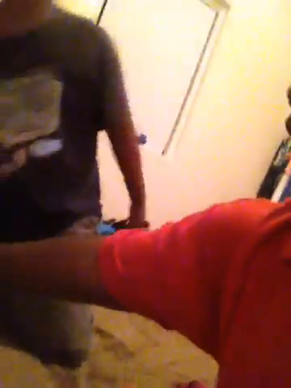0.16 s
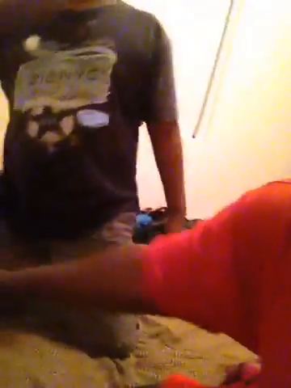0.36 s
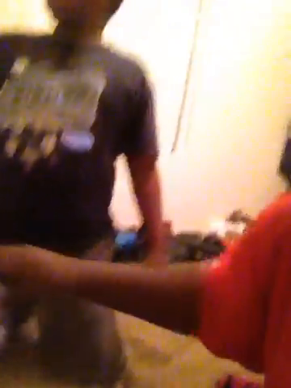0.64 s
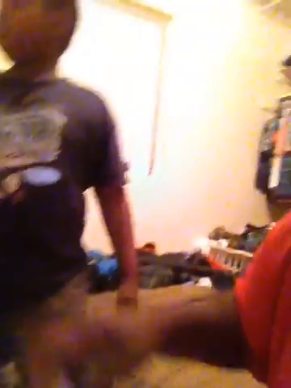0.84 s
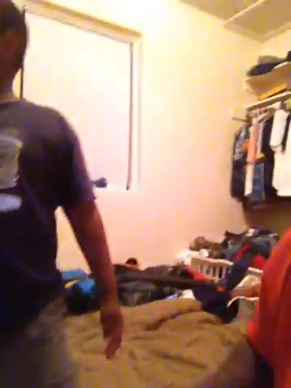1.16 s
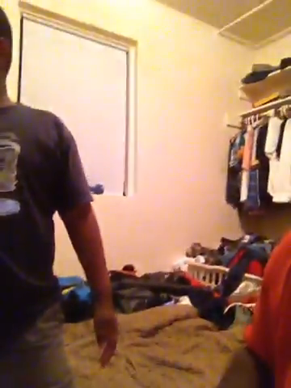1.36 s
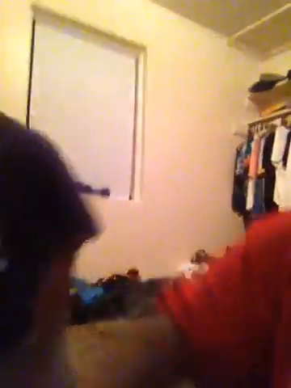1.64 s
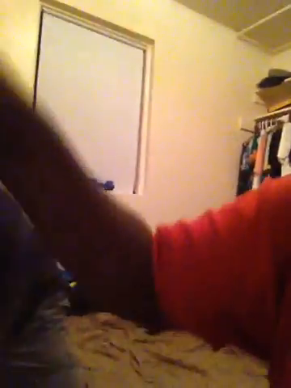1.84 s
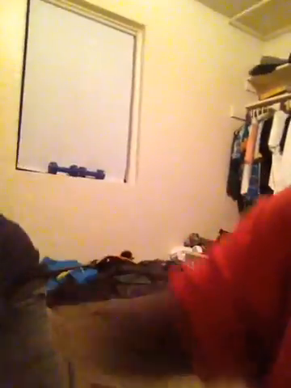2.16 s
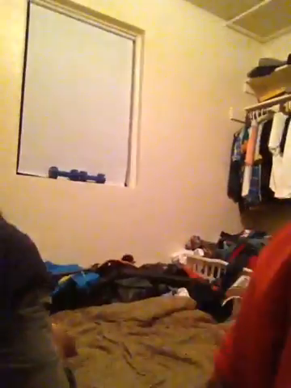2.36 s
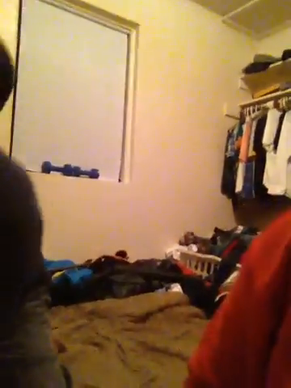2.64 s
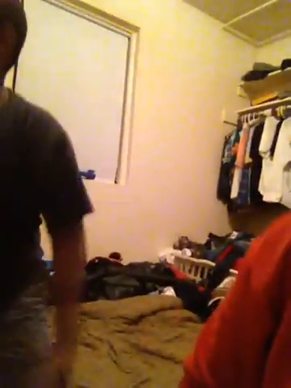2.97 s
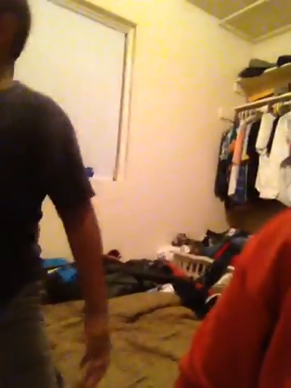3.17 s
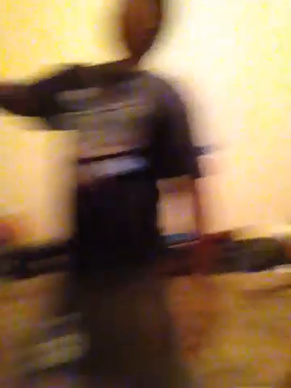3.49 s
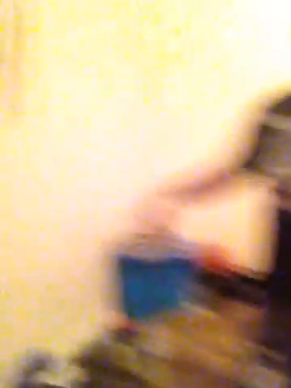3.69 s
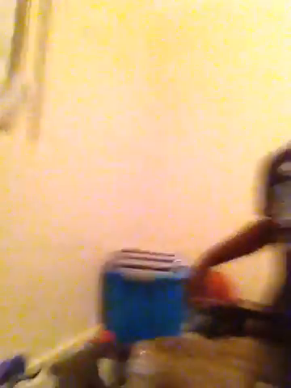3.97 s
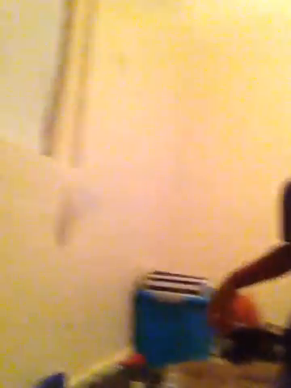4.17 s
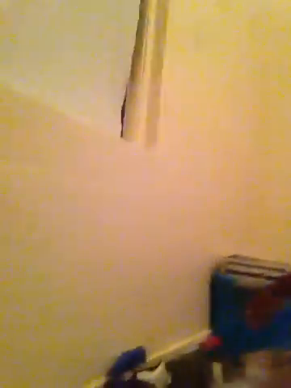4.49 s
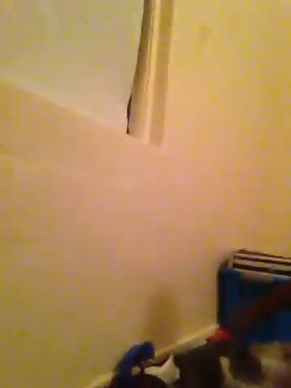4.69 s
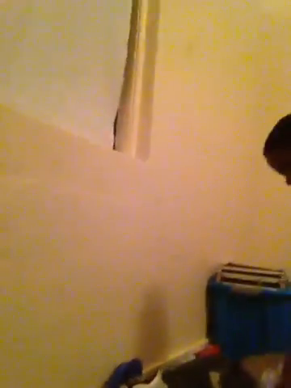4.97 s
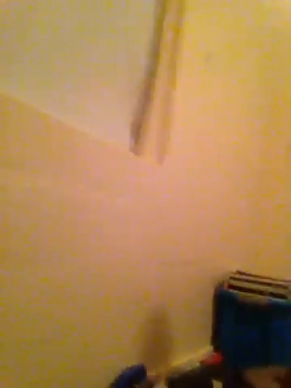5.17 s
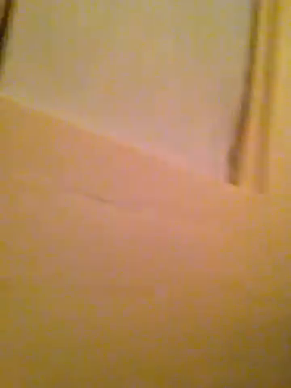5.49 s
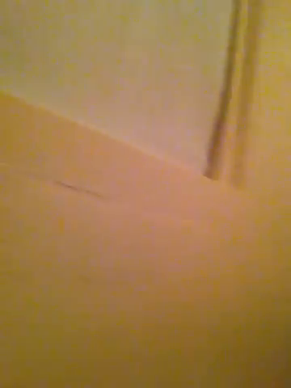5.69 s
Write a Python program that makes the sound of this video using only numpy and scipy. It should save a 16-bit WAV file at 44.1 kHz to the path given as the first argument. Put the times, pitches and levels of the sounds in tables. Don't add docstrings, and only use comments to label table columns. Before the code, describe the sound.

In a small furnished bedroom, a hollow empty plastic bottle rattles at once with a splash of water. Then part-filled bottles land one after another on a bed cover and floor, each a sharp knock, dull thud and burst of watery crackle. Hands pop dents in thin plastic between flips, and faint creaks come late. A small close microphone adds steady hiss and a faint high whistle.

```python
import sys
import numpy as np
from scipy import signal
from scipy.io import wavfile
from scipy.ndimage import uniform_filter1d

SR = 44100
rng = np.random.default_rng(int(sys.argv[2]) if len(sys.argv) > 2 else 0)


def to_linear_factor(level_db):
    exponent = np.asarray(level_db, float) / 20
    return 10 ** exponent


def waveform_to_disk(signal):
    frames = np.transpose(np.atleast_2d(signal))
    scaled = np.clip(frames, -1, 1) * 32767
    samples = np.round(scaled).astype(np.int16)
    wavfile.write(sys.argv[1], SR, samples)


N = 257014

# f/Hz, level/dB per Hz
HISS_SPECTRUM = [(15, -39), (40, -30.5), (90, -16), (143, -12.5), (214, 3), (865, -11.5), (1290, -10),
                 (3060, -13), (9440, -24.5), (13000, -19), (15400, -14)]
# t/s, f/Hz, level/dB
WHISTLE = [(0, 14250, -95), (.43, 14250, -95), (.47, 14260, -76), (2.9, 14150, -77), (4.75, 14110, -77),
           (4.82, 14130, -92), (5.42, 14230, -90), (5.47, 14260, -76), (5.83, 14260, -77)]
# t/s, blow level/dB, dullness/0-1
EMPTY_BOUNCES = [
    (0, -14, 0),
    (.031, -9.5, 0.92),
    (.042, -34, 1),
    (.05, -9.5, 0.44),
    (.063, -12, 0.1),
    (.097, -18.5, 0),
    (.112, -8.5, 0.38),
    (.124, -35, 0.2),
    (.148, -14, 0.26),
]
# f/Hz, level/dB, t60/s
EMPTY_MODES = [(615.2, -10, 0.22), (780.3, -8, 0.3), (678, -22, 0.32), (796, -3, 0.22), (840, -3, 0.19),
               (930, -9.5, .2), (947, -2.5, 0.052), (898, -9, 0.19), (1130, -9, 0.17), (1206, -2.5, 0.32),
               (1260, -6.5, 0.2), (1340.4, 2.5, 0.41), (1380, -5.5, 0.39), (1646, -2, 0.12),
               (1880, -9.5, 0.42), (2075, -6.5, 0.17), (2220, -23, 0.1), (2324, -10, 0.13),
               (2500, -11, 0.16), (2600, -13.5, 0.22), (2880, -20.5, 0.15)]
# t/s, peak level/dB, f/Hz
BELLY_FLEXES = [
    (0.027, -19.5, 790),
    (.043, -19.5, 832),
    (.06, -20, 812),
    (.05, -22, 1341),
    (.08, -28, 883),
    (0.088, -29, 800),
    (.035, -34.5, 626),
    (.07, -23.5, 710),
    (.114, -33, 640),
]
# f/Hz, level/dB per Hz
WATER_SPECTRUM = [(180, -48.5), (300, -6), (566, -4.5), (985, -0.5), (1630, -2), (1950, -3), (2680, -7),
                  (5000, -17.5), (6500, -33), (11000, -120)]
# f/Hz, level/dB per Hz
SPRAY_SPECTRUM = [(2060, -9), (3500, -3.5), (4740, -4.5), (6020, -8), (6450, -8), (9050, -14),
                  (14300, -11.5), (15300, -10.5)]
# start t/s, level/dB, hold/s, fade/dB per s, spray level/dB re water
LANDINGS = [(0, -25.5, 0.064, 332, -9.5), (.05, -32.5, 0.059, 148, -31.5), (.71, -50, 0.02, 154.5, -18),
            (.996, -20, 0.077, 306.5, -7), (1.526, -29.5, 0.045, 346.5, -6.5), (2.068, -35, 0.03, 535, -1),
            (2.367, -33, 0.052, 300, -6), (2.606, -32, 0.024, 262, -12.5), (2.657, -35, 0.034, 166.5, -12),
            (3.0555, -22, 0.021, 319, -5.5), (3.958, -19.5, 0.0092, 289, -9), (4.073, -30, 0.021, 300, -7),
            (4.105, -34, 0.011, 160, -17), (4.482, -27.5, 0.021, 298, -2), (4.52, -24.5, 0.013, 334, -7),
            (4.62, -45, 0.014, 70, -13.5), (5.325, -54.5, 0.058, 122, -3.5)]
# start t/s, level/dB, hold/s, fade/dB per s, spray level/dB re water
HANDLING = [(.33, -63.5, 0.33, 300, -6), (1.17, -49, 0.0076, 54, -22), (1.495, -59, .03, 400, -22),
            (1.676, -44, 0.0028, 246, -6), (1.71, -55, 0.14, 400, -1), (1.845, -42, 0.0017, 1500, -7),
            (1.907, -51, 0.018, 176, -6), (2.14, -56.5, 0.11, 301, 1.5), (2.252, -44, 0.084, 399, -14),
            (2.85, -66, .05, 106, -8), (3.266, -53.5, 0.13, 82, -4.5), (3.697, -50, 0.029, 174, -3),
            (3.862, -48, 0.0053, 1499.5, -30), (4.25, -61.5, 0.26, 300, -12),
            (4.905, -53.5, 0.03, 200, -27), (4.945, -53, 0.067, 110, -19), (5.14, -59.5, 0.1, 200, -14),
            (5.27, -55.5, 0.043, 208, -7), (5.5, -59.5, 0.06, 604, -5)]
# start t/s, level/dB, hold/s, fade/dB per s, spray level/dB re water
SWINGS = [
    (2.385, -29.5, 0.013, 207, -10),
    (3.59, -61.5, 0.051, 399, 1.5),
    (3.915, -34, .001, 394, -5),
]
# f/Hz, width/Hz, level/dB
BED_MODES = [(189, 44, -4.5), (220.7, 87, 1.5), (262, 305, -7.5), (348, 14, -14)]
# start t/s, level/dB, hold/s, fade/dB per s
THUDS = [(0, -36.5, 0.046, 198), (0.177, -58.5, 0.11, 97), (0.43, -62, 0.24, 301),
         (0.695, -54.5, 0.09, 157), (0.973, -43.5, 0.035, 299), (1.01, -29.5, 0.015, 181),
         (1.522, -31, 0.043, 330), (1.679, -44, 0.0074, 202), (1.727, -44.5, 0.076, 300),
         (1.909, -46.5, 0.011, 222), (2.058, -39.5, 0.017, 340), (2.241, -46, .005, 180),
         (2.373, -36.5, .03, 200), (2.393, -32.5, 0.045, 226), (2.596, -37, 0.014, 106),
         (2.887, -65, 0.095, 101), (3.057, -24.5, 0.0089, 500), (3.114, -36, 0.0062, 242),
         (3.273, -46.5, 0.03, 228), (3.477, -52.5, 0.097, 300), (3.676, -49, .015, 140),
         (3.854, -45.5, 0.0061, 605), (3.954, -32, 0.044, 316), (4.076, -38.5, 0.042, 214),
         (4.476, -29, 0.051, 350), (4.563, -44.5, 0.1, 125), (5.074, -56.5, 0.052, 54),
         (5.318, -53.5, 0.024, 128), (5.542, -57.5, 0.017, 400.5)]
# t/s, peak level/dB
CRACKS = [(0.0106, -28), (0.097, -25), (0.145, -38), (0.257, -46), (0.5955, -54), (0.7133, -52),
          (1.002, -12.5), (1.074, -9), (1.5272, -20), (1.55, -25), (2.3916, -23), (2.4048, -29),
          (2.5721, -51), (2.5906, -46), (2.6169, -36), (2.787, -53), (3.0726, -13), (3.2701, -47),
          (3.2852, -45), (3.2942, -38), (3.4311, -42), (3.5576, -46), (3.7999, -45), (3.8135, -49),
          (3.865, -42), (3.9505, -24), (4.0324, -37), (4.1319, -36), (4.1602, -40), (4.497, -29),
          (4.5302, -16), (4.5693, -26), (4.6759, -45), (4.7706, -43), (4.7965, -50), (4.8239, -46),
          (4.9028, -57), (4.9291, -50), (5.0195, -53), (5.1155, -51), (5.1447, -46), (5.2238, -50),
          (5.272, -56), (5.6078, -52.5)]
# t/s, peak level/dB, centre f/Hz, ring level/dB re burst
DULL_SNAPS = [(.586, -42, 815, -7), (.709, -31, 903, -5), (.965, -27, 593, 2), (1.214, -43.5, 850, 17.5),
              (1.274, -44, 835, -6), (1.502, -50, 1250, 7), (1.677, -40.5, 1370, 13), (1.845, -49, 746, 0),
              (1.928, -36.5, 740, 7), (2.253, -41, 1110, -3), (3.267, -35, 1470, 4.5),
              (3.558, -32, 784, -9), (3.697, -28, 940, -12), (3.858, -30.5, 1310, 3.5),
              (4.772, -22.5, 756, -9.5), (4.903, -40.5, 654, 7.5), (4.928, -45.5, 830, 10.5),
              (5.02, -29, 830, 1.5), (5.144, -27, 533, -2), (5.192, -37, 537, 3), (5.223, -35.5, 1010, -16),
              (5.243, -46, 800, 13), (5.572, -46, 1200, -10), (5.557, -40, 2000, -13),
              (5.607, -30.5, 870, -13)]
# t/s, peak level/dB, centre f/Hz, ring level/dB re burst
BRIGHT_SNAPS = [(0.0624, -11, 2110, -8), (0.732, -41, 1940, 9.5), (0.8194, -39, 4400, -4),
                (1.073, -7, 1980, -30), (1.6764, -23, 2020, -7), (1.812, -31.5, 3160, 0),
                (1.845, -28.5, 2890, 2.5), (1.929, -44, 2570, 13.5), (2.0674, -5, 7300, -11),
                (2.07, -30.5, 1830, 12), (2.3097, -39, 3560, 8.5), (2.368, -32, 1930, 14),
                (2.4257, -16.5, 2430, -4), (2.779, -36, 2730, 4), (2.787, -35.5, 4800, 0.5),
                (3.333, -32, 2810, 1), (3.379, -42, 3240, 8.5), (3.416, -38, 2270, 4),
                (3.449, -36, 2040, -15), (3.672, -31, 2500, -18), (3.713, -24.5, 1990, 3),
                (3.9426, -28, 1870, 8.5), (5.144, -39.5, 3480, -6), (5.2955, -36.5, 2070, -5),
                (5.3263, -34, 2000, 1), (5.436, -49.5, 3900, 14)]
# t/s, peak level/dB, ring f/Hz, thud level/dB re peak
BUMPS = [(0.713, -30.5, 325, -9), (1.543, -36, 310, -12), (1.734, -27.5, 412, 12), (1.789, -32, 312, 10),
         (1.803, -29, 312, 8), (1.906, -26.5, 305, -8), (1.925, -22, 312, -35), (2.659, -30, 405, -7),
         (2.688, -17, 354, -17), (3.498, -34, 306, 13.5), (4.468, -37, 295, 14)]
# t/s, peak level/dB, ring f/Hz, thud level/dB re peak, ring t60/s
KNOCKS = [(.964, -32.5, 316, -15, 0.053), (0.996, -7.5, 1060, 2.5, 0.0065), (1.021, -19, 1410, -12, 0.036),
          (1.046, -11.5, 1775, -31, 0.022), (1.527, -23, 395, -14, 0.09), (1.676, -33, 380, 18.5, 0.0093),
          (2.07, -41, 1770, -50, 0.054), (2.252, -31, 1110, -25, 0.049), (2.367, -22, 765, -21, 0.032),
          (2.424, -21.5, 782, -19, 0.061), (2.607, -17.5, 413, -4, 0.042), (3.056, -5.5, 1834, -27, 0.024),
          (3.061, -21, 568, 7.5, 0.16), (3.854, -59, 1260, -29.5, .014), (3.958, -8, 1890, 1, 0.011),
          (4.075, -20, 406, 16, 0.079), (4.109, -26.5, 820, 18, 0.06), (4.482, -28.5, 301, -29, .012),
          (4.521, -30, 990, -1, 0.017), (5.113, -27, 334, -43, 0.097)]
# t/s, peak level/dB
CAP_RATTLES = [
    (.732, -58),
    (2.067, -30),
    (2.254, -53.5),
    (3.673, -52.5),
    (3.932, -54.5),
    (4.775, -62),
    (5.114, -53),
    (5.326, -55),
]
# t/s, peak level/dB
TICKS = [
    (0.733, -50),
    (1.018, -24),
    (1.046, -44),
    (1.526, -63),
    (3.195, -48),
    (2.609, -46),
    (4.481, -47),
]
# start t/s, level/dB, hold/s, fade/dB per s
DRAGS = [(0.738, -59.5, 0.028, 150), (0.817, -64, 0.016, 151), (3.956, -26, 0.023, 313),
         (4.105, -43.5, 0.028, 250), (1.046, -29, 0.032, 196.5), (2.42, -46, 0.023, 200),
         (2.675, -58, 0.036, 198), (3.326, -57, 0.021, 119), (3.406, -72, 0.046, 196),
         (4.26, -66, 0.036, 152), (4.536, -47, 0.032, 250), (4.933, -63.5, 0.12, 130),
         (5.317, -53, 0.051, 250), (5.416, -65, 0.037, 201)]
# f/Hz, level/dB per Hz
CLOTH_SPECTRUM = [(500, -42.5), (1200, -1.5), (2000, -1), (3900, -3), (4600, -6.5), (7000, -17),
                  (12000, -38)]
# t/s, peak level/dB, f/Hz
FLECKS = [(0.965, -43, 970), (0.994, -36, 3640), (0.997, -30, 3250), (1.003, -26, 2380),
          (1.009, -19.5, 1957), (1.013, -17.5, 708), (1.015, -27, 3260), (1.035, -30.5, 4980),
          (1.048, -29, 1730), (1.051, -28, 996), (1.071, -30.5, 4670), (1.092, -31.5, 833),
          (1.531, -36, 2460), (1.534, -28, 1094), (1.675, -48, 1600), (1.846, -47, 725), (1.906, -47, 697),
          (2.065, -34, 4800), (2.067, -36.5, 2500), (2.068, -45, 4090), (2.07, -46, 2970),
          (2.07, -34, 1017), (2.079, -32, 1816), (2.084, -35, 831), (2.366, -45, 2280), (2.367, -39, 1055),
          (2.422, -35, 2420), (2.425, -33, 4180), (2.605, -37, 1214), (3.054, -41, 5000),
          (3.054, -27, 3360), (3.055, -29, 2480), (3.061, -37, 864), (3.067, -26, 2495), (3.067, -34, 1094),
          (3.083, -25.5, 840), (3.485, -48, 835), (3.708, -46, 1460), (3.961, -22, 688), (3.962, -27, 2790),
          (3.964, -26, 1105), (3.964, -23, 2026), (3.965, -27.5, 4970), (3.967, -27, 3230),
          (3.967, -24.5, 3960), (3.98, -31, 1955), (4.489, -28, 1380), (4.491, -38, 520),
          (4.492, -34, 2480), (4.498, -31, 5320), (4.527, -27, 2040), (4.557, -29.5, 1082),
          (4.633, -47, 1920), (5.017, -45, 750)]
# t/s, peak level/dB, f/Hz
HEAVES = [(1.025, -22, 240), (1.135, -40, 217), (1.672, -45, 380), (1.778, -39, 220), (1.914, -44, 301),
          (2.074, -34.5, 244), (2.244, -42.5, 340), (2.308, -50, 300), (2.447, -42, 280),
          (2.469, -30.5, 164.4), (2.607, -33.5, 377), (2.62, -31, 202), (2.657, -31.5, 405),
          (2.691, -35, 217), (2.702, -37, 393), (2.878, -52.5, 188), (3.06, -29, 115), (3.06, -15, 226),
          (3.137, -31, 216.5), (3.495, -57, 187), (4.017, -35, 240), (4.103, -33, 396), (4.162, -43, 242),
          (4.188, -43, 220), (4.492, -24.5, 262), (4.589, -37.5, 183), (4.644, -39, 270), (4.699, -41, 237),
          (4.75, -50, 237), (5.068, -52, 243), (5.191, -46, 312), (5.322, -49.5, 263)]
# start t/s, level/dB, pitch f/Hz, length/s
CREAKS = [
    (3.481, -61, 3000, 0.054),
    (3.72, -54, 1950, 0.06),
    (3.792, -59.5, 2300, 0.061),
    (4.625, -46, 1950, 0.055),
    (4.105, -49, 3640, 0.048),
    (4.6, -53, 1040, 0.053),
    (4.1, -60, 4800, .05),
    (4.5, -66, 4000, .1),
    (5.44, -66, 3700, .06),
]
# f/Hz, t60/s
ROOM_DECAY = [(150, 0.48), (800, 0.42), (3000, 0.44), (9000, 0.25)]

BED_RISE_S = 0.0077


def evened(x):
    return x / np.sqrt(np.mean(x ** 2) + 1e-20)


def read(points, hz):
    f, value = np.transpose(points)
    return np.interp(np.log(hz + 1), np.log(f + 1), value)


def add(mix, s, sound):
    part = mix[round(s * SR):][:len(sound)]
    part += sound[:len(part)]


def colour(x, points):
    level_db = read(points, abs(np.fft.fftfreq(4096, 1 / SR)))
    log_gain = np.log(to_linear_factor(np.maximum(level_db, -90)))
    taps = np.fft.ifft(np.exp(np.conj(signal.hilbert(log_gain)))).real[:2048]
    return evened(signal.oaconvolve(x, taps)[:len(x)])


def resonate(x, hz, width):
    r = np.exp(-np.pi * width / SR)
    return 2 * signal.lfilter([1 - r], [1, -r * np.exp(2j * np.pi * hz / SR)], x).real


def narrowed(x, hz, width):
    return evened(resonate(resonate(x, hz, width), hz, width))


def ring(t, hz, t60):
    return to_linear_factor(-60 * t / t60) * np.sin(2 * np.pi * hz * t)


def modes(rows, trim_db, rise, t60):
    out, t = np.zeros(N), np.arange(6000) / SR
    onset = np.sin(np.pi / 2 * np.minimum(t / rise, 1)) ** 2
    for s, peak_db, hz in rows:
        add(out, s, to_linear_factor(peak_db + trim_db) * onset * ring(t, hz, t60))
    return out


def swell(start, level_db, hold, fade, rise):
    t = np.arange(round((rise + hold + 70 / fade) * SR)) / SR
    fading = to_linear_factor(level_db - fade * np.maximum(t - rise - hold, 0))
    return start, (fading * np.minimum(t / rise + 0.033, 1)) ** 2


def movement(rows, rise):
    power = np.zeros(N)
    for row in rows:
        add(power, *swell(*row, rise))
    return np.sqrt(power)


def crackle(per_s, spread_db, smooth):
    size = to_linear_factor(spread_db * np.minimum(rng.exponential(1, N), 3)) * (rng.random(N) < per_s / SR)
    clicks = evened(size * rng.choice([-1., 1.], N))
    return clicks + smooth * rng.standard_normal(N)


def patchy(x, depth_db, size):
    hz, t, z = signal.stft(x, SR, nperseg=512)
    patches = uniform_filter1d(rng.standard_normal(z.shape), size, 1)
    patches = uniform_filter1d(patches, 2, 0)
    return evened(signal.istft(z * to_linear_factor(depth_db * evened(patches)), SR, nperseg=512)[1][:N])


def microphone_floor():
    s, hz, db = np.transpose(WHISTLE)
    t = np.arange(N) / SR
    flutter = narrowed(rng.standard_normal(N), 0, 150)
    pitch = np.interp(t, s, hz) + 130 * flutter
    whistle = np.sqrt(2) * np.sin(2 * np.pi * np.cumsum(pitch) / SR)
    hiss = patchy(colour(rng.standard_normal(N), HISS_SPECTRUM), depth_db=1.4, size=12)
    return to_linear_factor(-63.5) * hiss + to_linear_factor(np.interp(t, s, db)) * whistle


def empty_bottle():
    out, t = np.zeros(N), np.arange(SR // 3) / SR
    spots = rng.uniform(-1.2, 1, (len(EMPTY_BOUNCES), len(EMPTY_MODES), 2))
    for (s, blow_db, dull), spot in zip(EMPTY_BOUNCES, spots):
        for (hz, db, t60), (w, shift) in zip(EMPTY_MODES, spot):
            mode = ring(t, hz * (1 + .004 * shift), t60)
            dulling_db = 18.7 * dull * np.log2(hz / 800)
            add(out, s, np.sign(w) * to_linear_factor(blow_db - 12.5 + db + 0.91 * w - dulling_db) * mode)
        add(out, s, to_linear_factor(blow_db - 3) * dull * ring(t, 825, .035))
    out = signal.sosfilt(signal.butter(2, 450, "high", fs=SR, output="sos"), out)
    return out * to_linear_factor(-190 * np.maximum(np.arange(N) / SR - .3, 0))


def bubbles(per_s, low_hz, high_hz, cycles):
    out = np.zeros(N)
    for hz in np.geomspace(low_hz, high_hz, 14):
        u = np.arange(int(3 * cycles * SR / hz)) * hz / SR
        pop = np.exp(-u / cycles) * np.minimum(u, 1) * np.sin(2 * np.pi * (u + 0.0025 * u ** 2))
        size = to_linear_factor(2.0 * np.minimum(rng.exponential(1, N), 2.5)) * (rng.random(N) < per_s / 14 / SR)
        out += signal.oaconvolve(size, pop)[:N]
    return evened(out)


def clumps(per_s, depth_db, fade_s):
    starts = rng.exponential(1, N) * (rng.random(N) < per_s / SR)
    bunch = signal.lfilter([1], [1, -np.exp(-1 / (fade_s * SR))], starts)
    return evened(to_linear_factor(depth_db * np.minimum(bunch, 2.5)))


def slosh():
    pops = bubbles(per_s=900, low_hz=527.0, high_hz=4400, cycles=4.7)
    lumps = crackle(per_s=2500, spread_db=3.5, smooth=.72) + .4 * pops
    water = patchy(colour(lumps, WATER_SPECTRUM), depth_db=2.2, size=7)
    drops = crackle(per_s=2500, spread_db=3.5, smooth=.95)
    spray = patchy(colour(drops, SPRAY_SPECTRUM), depth_db=1.3, size=4)
    bunched = clumps(per_s=45, depth_db=1.8, fade_s=.009)
    wet, fine = np.zeros((2, N))
    for rows, rise in ((LANDINGS, 0.0011), (HANDLING, 0.0016), (SWINGS, 0.054)):
        for s, level_db, hold, fade, spray_db in rows:
            add(wet, *swell(s, level_db, hold, fade, rise))
            add(fine, *swell(s, level_db + spray_db, hold * 1.16, fade * 0.78, rise))
    return to_linear_factor(-3.5) * bunched * (np.sqrt(wet) * water + np.sqrt(fine) * spray)


def bed_thuds():
    push = crackle(per_s=300, spread_db=3.0, smooth=1.06)
    bed = sum(to_linear_factor(db) * resonate(resonate(push, hz, 3 * w), hz, w) for hz, w, db in BED_MODES)
    return to_linear_factor(-3.5) * movement(THUDS, BED_RISE_S) * evened(bed)


def floor_shake():
    shake = narrowed(rng.standard_normal(N), 97, 100)
    return to_linear_factor(-22.5) * movement(THUDS, BED_RISE_S) * shake


def cracks():
    out, t = np.zeros(N), np.arange(800) / SR
    for s, peak_db in CRACKS:
        rush = rng.standard_normal(len(t))
        puff = evened(resonate(np.diff(rush, prepend=0), 2900, 2900))
        add(out, s, to_linear_factor(peak_db - 12 - 60 * t / 0.01) * puff)
    return out


def belly_flexes():
    return modes(BELLY_FLEXES, trim_db=0, rise=.004, t60=0.16)


def snaps():
    out, t = np.zeros(N), np.arange(2000) / SR
    for rows, t60 in ((DULL_SNAPS, 0.017), (BRIGHT_SNAPS, .014)):
        for s, peak_db, hz, ring_db in rows:
            burst = narrowed(rng.standard_normal(len(t)), hz, 1.1 * hz) * to_linear_factor(-60 * t / t60)
            tone = to_linear_factor(ring_db) * ring(t, hz, 1.48 * t60)
            add(out, s, to_linear_factor(peak_db - 10.0) * (0.73 * burst + tone))
    return out


def knocks():
    out, t = np.zeros(N), np.arange(5000) / SR
    for s, peak_db, hz, thud_db, t60 in [*KNOCKS, *[(*row, 0.025) for row in BUMPS]]:
        spread = rng.uniform(-0.615, 1, 3)
        wall = ring(t, hz, t60)
        for k, d in zip((.62, 1.55, 2.4), spread):
            wall = wall + 0.2 * ring(t, hz * k * (1 + 0.27 * d), t60)
        push = ring(t, 215 * (1 + 0.2 * spread[0]), 0.032) * np.minimum(t / 0.015, 1)
        blow = wall * np.minimum(t * hz / 1.23, 1) + to_linear_factor(thud_db + 4) * push
        add(out, s, to_linear_factor(peak_db - 5.0) * blow)
    return out


def cap_rattles():
    out, t = np.zeros(N), np.arange(6000) / SR
    for s, peak_db in CAP_RATTLES:
        thin = narrowed(rng.standard_normal(len(t)), 13900, 5800)
        add(out, s, to_linear_factor(peak_db - 60 * t / 0.21) * thin)
    return out


def ticks():
    out, t = np.zeros(N), np.arange(5000) / SR
    bright = colour(rng.standard_normal(N), SPRAY_SPECTRUM)
    for s, peak_db in TICKS:
        add(out, s, to_linear_factor(peak_db - 60 * t / 0.059) * bright[round(s * SR / 2):][:len(t)])
    return out


def rustle():
    cloth = colour(crackle(per_s=1500, spread_db=3.5, smooth=1.6), CLOTH_SPECTRUM)
    return movement(DRAGS, 0.004) * cloth


def flecks():
    return modes(FLECKS, trim_db=2, rise=0.0026, t60=0.06)


def heaves():
    return modes(HEAVES, trim_db=3, rise=0.0083, t60=.11)


def creaks():
    out = np.zeros(N)
    for s, level_db, hz, length in CREAKS:
        shape = np.sqrt(np.hanning(round(length * SR)))
        tone = narrowed(rng.standard_normal(SR // 10), hz, 440)
        add(out, s, to_linear_factor(level_db) * shape * tone[:len(shape)])
    return out


def room(x):
    taps = np.zeros(SR // 2)
    at = np.arange(160, len(taps) - 20, 20)
    taps[at + rng.integers(0, 20, len(at))] = rng.choice([-1., 1.], len(at))
    hz, t, z = signal.stft(taps, SR, nperseg=256)
    decay = to_linear_factor(-60 * t / read(ROOM_DECAY, hz)[:, None])
    tail = signal.istft(z * decay, SR, nperseg=256)[1]
    return signal.fftconvolve(x, tail / np.linalg.norm(tail))[:N]


def scene():
    empty = empty_bottle() + belly_flexes()
    water = slosh() + bed_thuds()
    pops = snaps()
    hits = knocks() + ticks() + flecks() + heaves()
    echoes = room(to_linear_factor(-13) * hits + to_linear_factor(-12) * water + to_linear_factor(-14) * empty + to_linear_factor(-12) * pops)
    close = floor_shake() + cracks() + cap_rattles() + rustle() + creaks()
    return np.array([empty + water + pops + hits + echoes + close] * 2)


def roll_off(x):
    return signal.sosfilt(signal.butter(12, 16540, fs=SR, output="sos"), x)


def record(dry):
    thin = signal.sosfilt(signal.butter(3, 120, "high", fs=SR, output="sos"), dry)
    heard = thin + microphone_floor()
    band_limit = signal.firwin(511, 15250, window=("kaiser", 4), fs=SR)
    mix = signal.oaconvolve(heard, band_limit[None], "same")
    return roll_off(mix)


dry = scene()
out = record(dry)
waveform_to_disk(out)
```